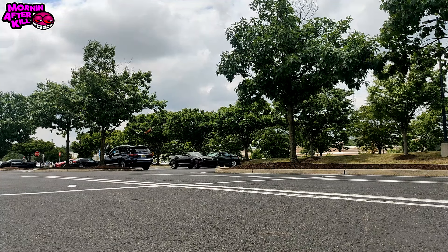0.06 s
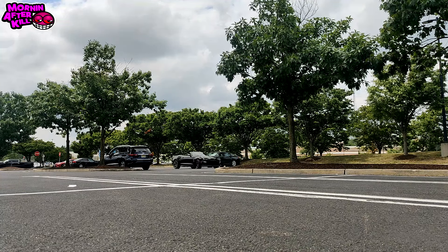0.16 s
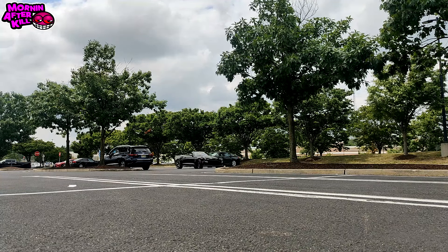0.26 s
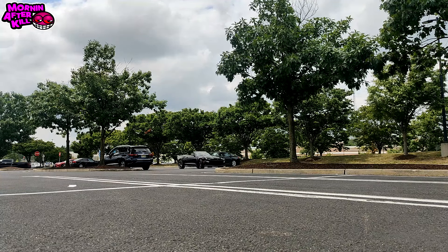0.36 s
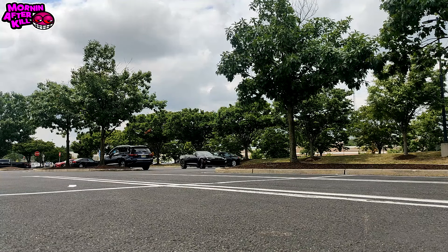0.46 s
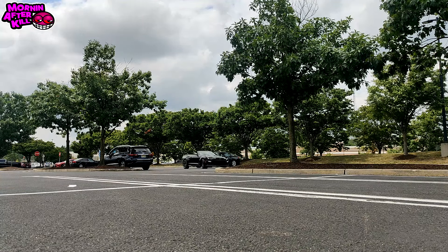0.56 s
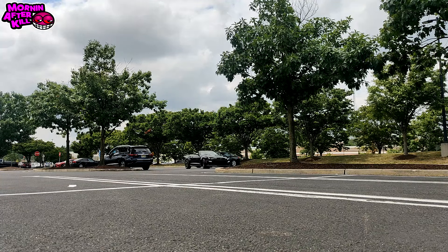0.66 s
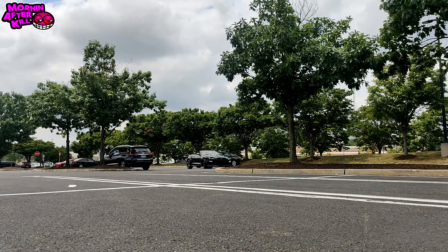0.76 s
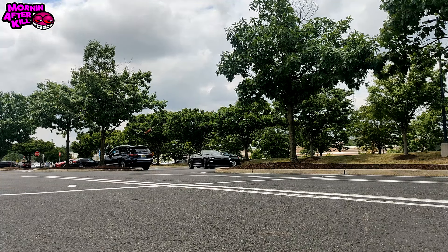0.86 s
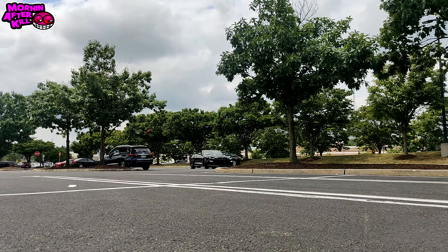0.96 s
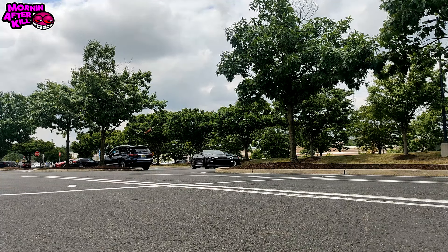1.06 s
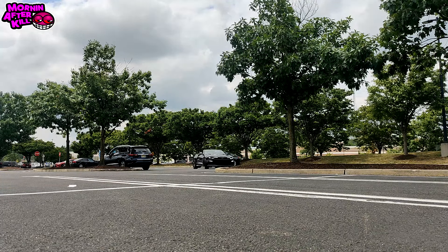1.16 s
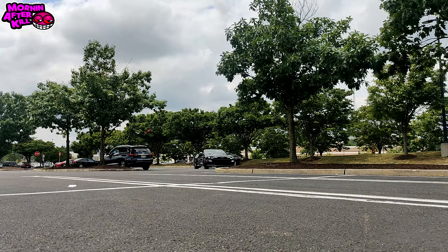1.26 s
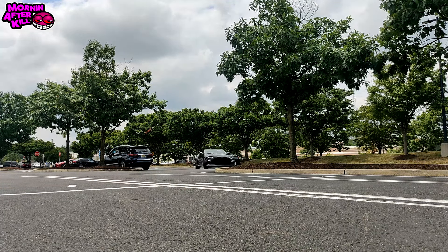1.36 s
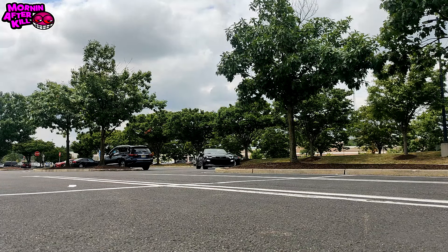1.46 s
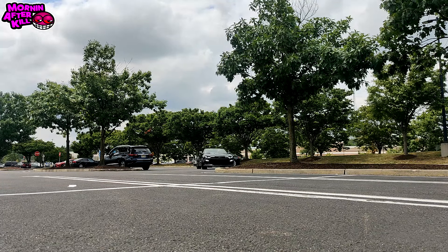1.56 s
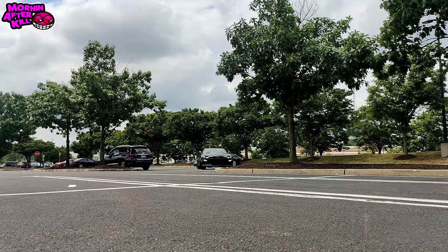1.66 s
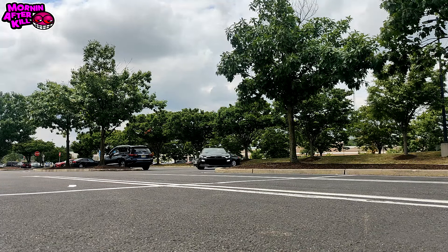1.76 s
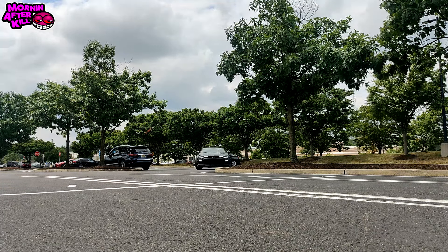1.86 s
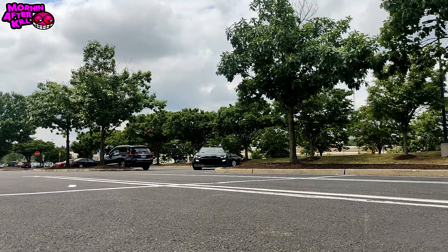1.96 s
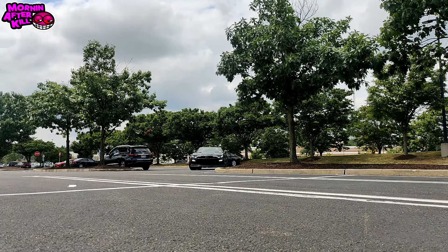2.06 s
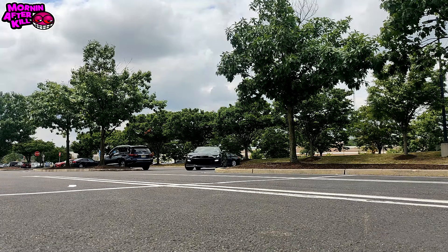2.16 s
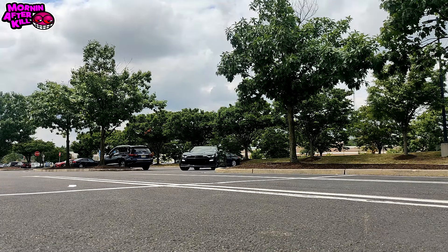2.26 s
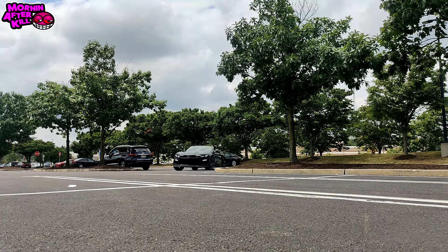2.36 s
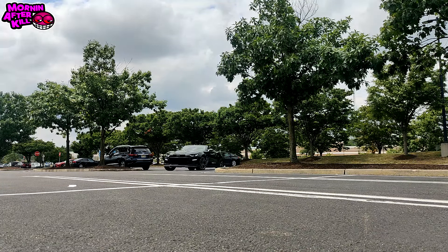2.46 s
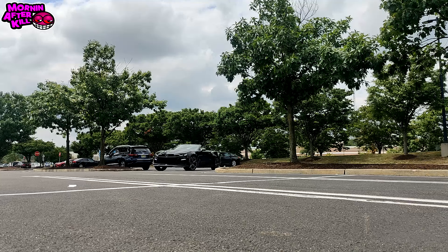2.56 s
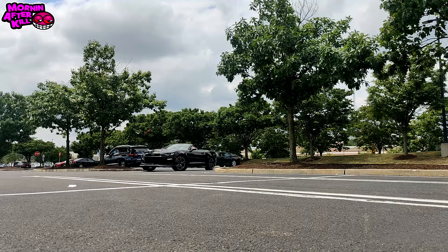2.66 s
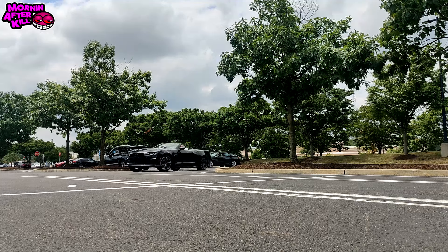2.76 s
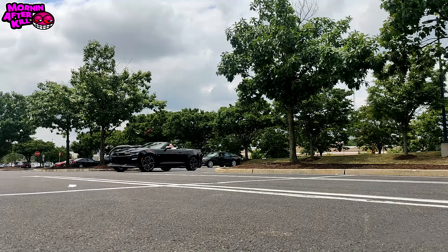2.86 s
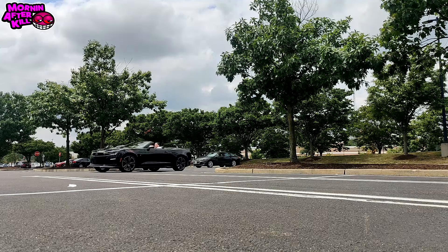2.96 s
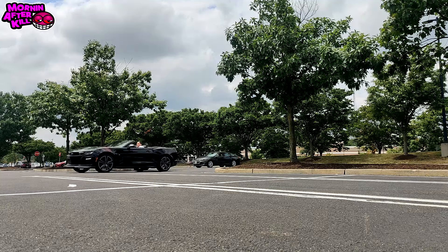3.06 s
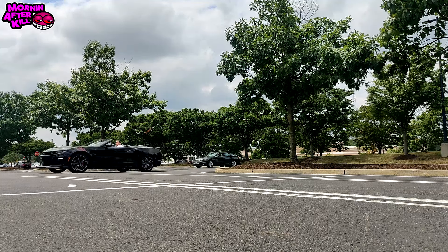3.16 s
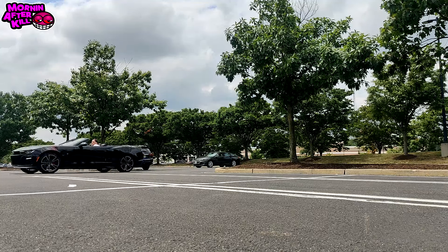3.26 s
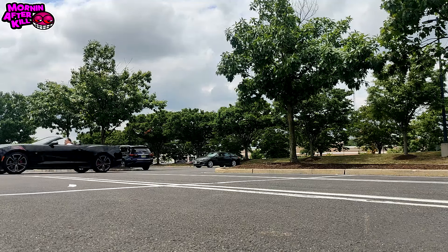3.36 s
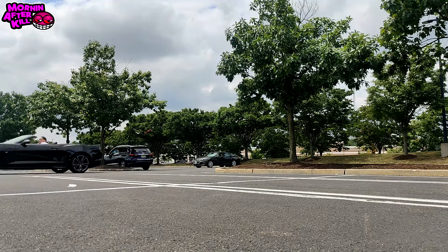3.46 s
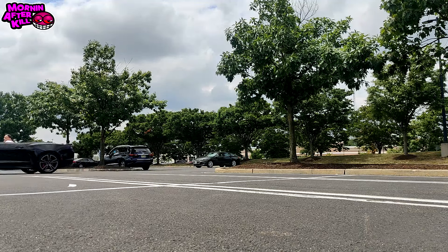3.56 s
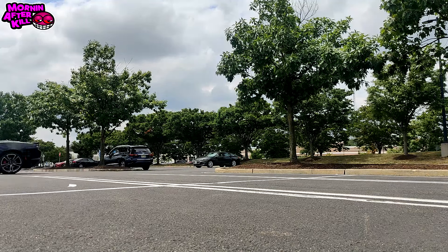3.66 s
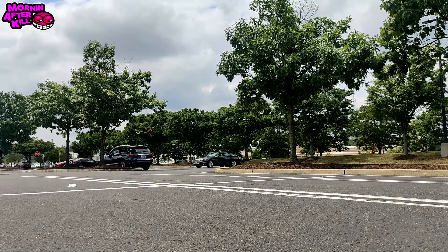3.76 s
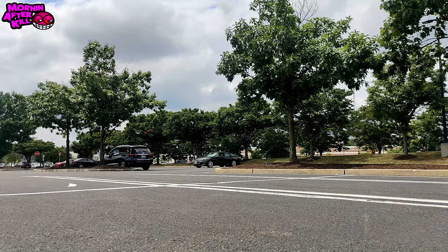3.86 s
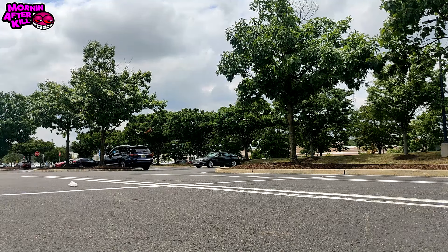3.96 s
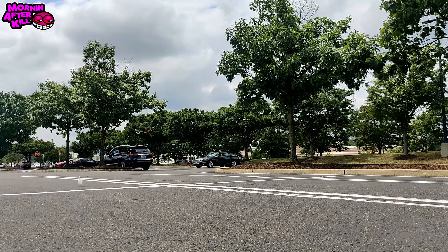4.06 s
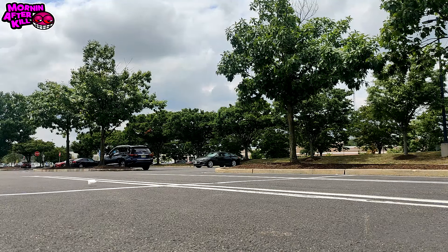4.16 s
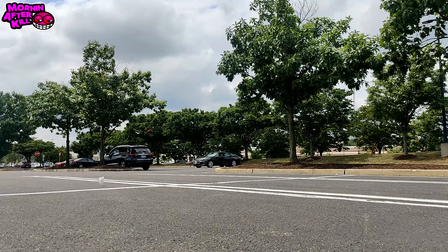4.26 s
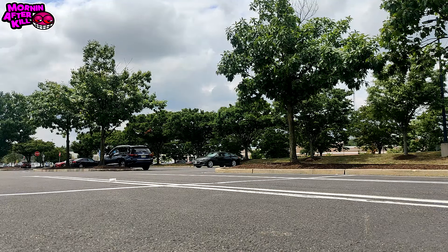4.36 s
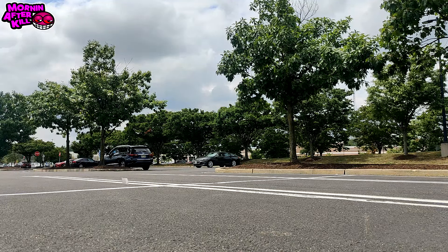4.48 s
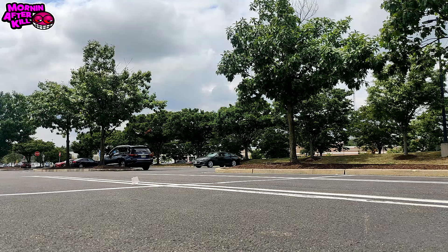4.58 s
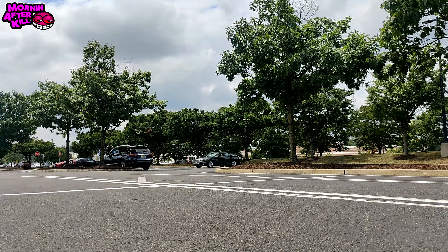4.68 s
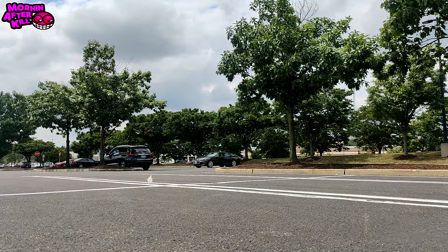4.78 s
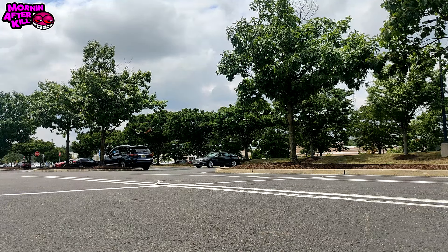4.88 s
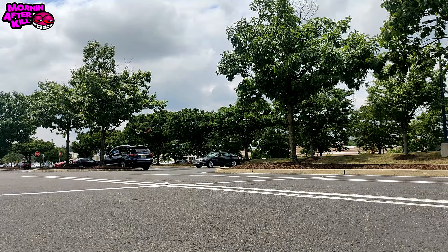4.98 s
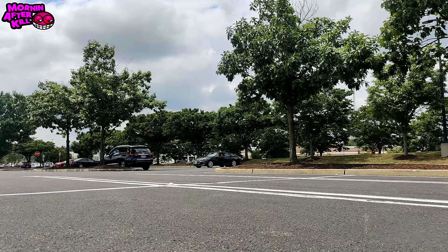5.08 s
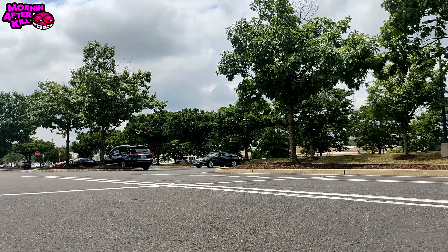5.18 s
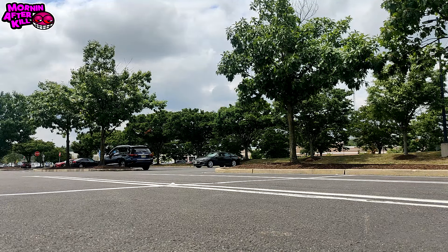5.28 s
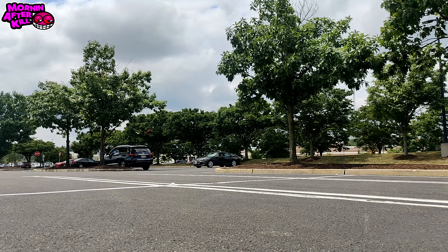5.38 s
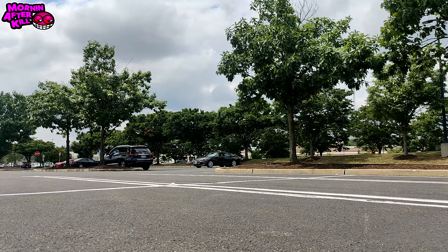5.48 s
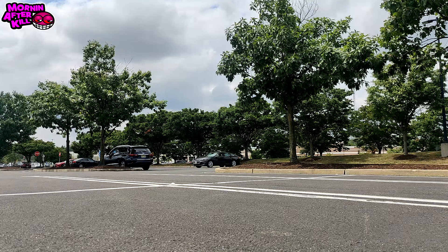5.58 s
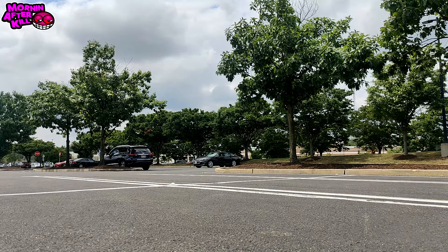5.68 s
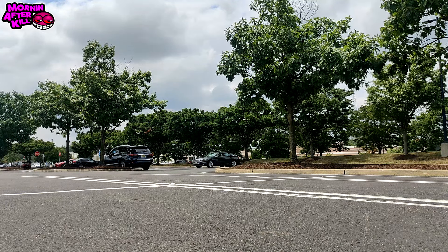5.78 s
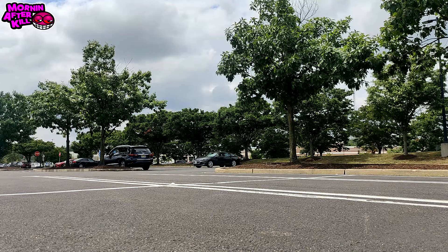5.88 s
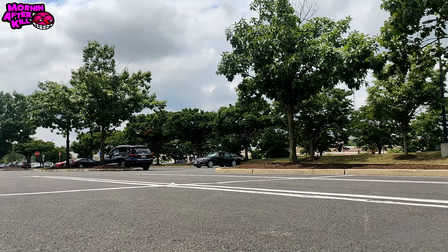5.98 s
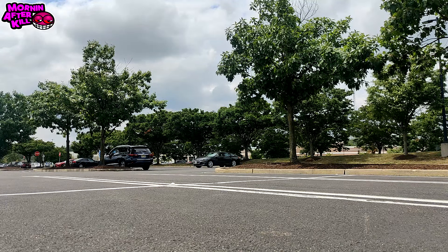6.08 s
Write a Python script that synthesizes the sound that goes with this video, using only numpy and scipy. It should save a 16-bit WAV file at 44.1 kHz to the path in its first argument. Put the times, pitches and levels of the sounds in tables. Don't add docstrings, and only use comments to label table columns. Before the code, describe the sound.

Wind rumbles over a parking lot as a throaty car engine climbs, roars past close by, drops in pitch and fades into tyre hiss.

```python
import sys
import numpy as np
from scipy import signal
from scipy.fft import rfft, irfft, next_fast_len
from scipy.io import wavfile
from scipy.ndimage import uniform_filter1d, map_coordinates

SR = 44100
rng = np.random.default_rng(int(sys.argv[2]) if len(sys.argv) > 2 else 0)


def ratio_of_db(decibels):
    return 10 ** (np.asarray(decibels, float) / 20)


def store_wav(level_fs):
    pcm = np.round(np.clip(np.atleast_2d(level_fs), -1, 1) * 32767)
    wavfile.write(sys.argv[1], SR, pcm.T.astype(np.int16))


N = 270330

# t/s, left lag/samples, left minus right/dB,
# direct share/0-1
BEARING = [(0, 1.5, 2, 0.53), (.5, 2.5, 1, 0.46), (1.1, 8.5, 2, 0.5), (1.9, 10, 0, 0.6),
           (2.1, -5, 1.5, 0.3), (2.5, 1, 1.5, 0.6), (2.9, -3.5, 1.5, 0.8), (3.3, -4.5, 1.4, 0.34),
           (3.7, -8.5, 0, 0.3), (4.1, -16, .5, 0.7), (4.3, -20, 2.5, 0.88), (4.7, -21, 2, 0.74),
           (5.1, -22, 1.5, 0.82), (6.13, -19.5, 2, 0.5)]
# t/s, level/dB
TYRES = [(0, -46), (.63, -48.5), (1.67, -44.5), (2.2, -44), (2.3, -41), (2.62, -41), (2.87, -33.5),
         (3.02, -37), (3.2, -40.5), (3.4, -37), (3.6, -32), (3.77, -33), (3.8, -29), (3.91, -30),
         (3.96, -34.5), (4.2, -40), (4.55, -43), (6.13, -53.5)]
# t/s, level/dB
GAS_FLOW = [(0, -37.5), (1, -34.5), (1.6, -34), (2.24, -29), (2.4, -24.5), (2.72, -23.5), (2.84, -16.5),
            (3.0, -32), (3.3, -21.5), (3.56, -28), (3.78, -29.5), (3.92, -16.5), (4.15, -20), (4.3, -30),
            (4.55, -26), (4.8, -27), (5.2, -25), (6.13, -31.5)]
LIFT_S = 4.15
THROB_AT = .59


def unit(x):
    return x / np.sqrt(np.mean(x ** 2) + 1e-20)


def curves(rows):
    s, *cols = np.transpose(rows)
    return [np.interp(np.arange(N) / SR, s, c) for c in cols]


def wobble(rate):
    coarse = np.arange(0, N + 32, 32)
    knots = rng.standard_normal(int(N * rate / SR) + 4)
    return np.interp(np.arange(N), coarse, map_coordinates(knots, [coarse * rate / SR]))


def gate(s, takes_s):
    return .5 + .5 * np.tanh((np.arange(N) / SR - s) / takes_s)


def bump(s, rise_s, fall_s):
    d = np.arange(N) / SR - s
    return np.exp(-(d / np.where(d < 0, rise_s, fall_s)) ** 2)


def filtered(x, response):
    m = next_fast_len(N + SR // 2)
    return irfft(rfft(x, m) * response(np.fft.rfftfreq(m, 1 / SR)), m)[..., :N]


def colour(points):
    f, db = np.transpose(points)
    return lambda hz: ratio_of_db(np.interp(np.log(hz + 1), np.log(f + 1), db))


def peaks(modes, hz):
    return np.sqrt(sum(ratio_of_db(2 * db) / (1 + ((hz ** 2 - c * c) / ((hz + 1) * w)) ** 2) for c, w, db in modes))


def noise(response, patchy_db):
    z = signal.stft(rng.standard_normal((3, N)), nperseg=512)[2]
    field = uniform_filter1d(rng.standard_normal(z.shape[1:]), size=6, axis=0)
    field = uniform_filter1d(field, size=12, axis=1)
    patchy = signal.istft(z * ratio_of_db(patchy_db * unit(field)), nperseg=512)[1][:, :N]
    return unit(filtered(patchy, response))


def both_ports(response, patchy_db, own):
    common, left, right = noise(response, patchy_db)
    return unit(np.array([common + own * left, 0.88 * (common + own * right)]))


def traffic():
    # f/Hz, level per Hz/dB
    drone = [(50, -120), (75, -0.5), (110, -0.5), (170, -5), (220, -6), (270, -18), (350, -120)]
    swell_db = 6.5 * bump(2.8, 0.92, 0.38)
    duck_db = -11.5 * bump(3.74, 0.058, 0.083)
    return ratio_of_db(-30.5 + swell_db + duck_db) * both_ports(colour(drone), 1.0, own=0.16)


def wind():
    # t/s, level/dB
    wind_levels = [(0.0, -28), (0.01, -28), (1.55, -26), (1.59, -35), (1.72, -22.5), (1.83, -29.5), (2.99, -27),
                   (3.12, -34), (3.28, -25.5), (3.64, -38), (4.76, -23.5), (4.83, -28.5), (4.97, -24),
                   (5.57, -26.5), (5.6, -30), (5.86, -25), (5.89, -28.5), (6.13, -25)]
    # f/Hz, level per Hz/dB
    rumble = [(8, -39), (12, 4.5), (27, -1.5), (59, 1.5), (80, -9.5), (100, -25.5), (140, -120)]
    wind_db = curves(wind_levels)[0] + wobble(14)
    buffet = np.tanh(.6 * both_ports(colour(rumble), .8, own=.38))
    return ratio_of_db(wind_db + 1.5) * unit(buffet)


def grit():
    # t/s, peak level/dB
    ticks = [(2.08, -40.5), (2.239, -37), (3.907, -40.5), (4.2494, -42), (4.4957, -39.5), (4.5294, -43.5),
             (4.6708, -33.5), (4.9174, -43.5), (5.055, -53), (5.1594, -49.5)]
    out, t = np.zeros(N), np.arange(400) / SR
    for s, db in ticks:
        decay = ratio_of_db(db - 5 - 60 * t / .008)
        out[round(s * SR):][:len(t)] += decay * np.diff(rng.standard_normal(len(t) + 1))
    return out * ratio_of_db([[3], [-3]])


def squeaks():
    # start t/s, length/s, f/Hz, level/dB, pitch blur/Hz
    tones = [(0, .4, 7000, -64, 60), (1.2, 1.0, 448, -41, 4), (1.82, .27, 6900, -60, 60),
             (2.225, .065, 2940, -46, 90), (2.3, .055, 2940, -48, 90), (4.298, .018, 880, -25, 20)]
    t, out = np.arange(N) / SR, np.zeros(N)
    for s, length, hz, db, blur_hz in tones:
        shape = np.abs(np.sin(np.pi * np.clip((t - s) / length, 0, 1)) ** .35)
        phase = 2 * np.pi * np.cumsum(hz + blur_hz * wobble(55)) / SR
        out += ratio_of_db(db + 1.9 * wobble(40)) * shape * np.sin(phase)
    return out


def tyre_hiss(near_db, flutter):
    # f/Hz, level per Hz/dB
    treble = [(6000, -120), (7500, 3), (10000, 1), (13000, 1.5), (15700, 3.5), (15800, -43.5),
              (16400, -120)]
    fan_db = 5.5 * bump(2.8, .25, 0.46)
    masked_db = -7 * bump(3.86, 0.14, 0.11)
    wake_db = 5 * bump(4.3, 0.19, 0.37)
    level_db = -61 + 0.78 * near_db + fan_db + masked_db + wake_db
    lean = ratio_of_db([[0], [1.2], [-1.2]])
    return ratio_of_db(level_db + 0.8 * flutter + .7 * wobble(22)) * lean * noise(colour(treble), .8)


def tyre_rush(puff, flutter):
    # f/Hz, level per Hz/dB
    tread = [(1200, -120), (1700, -8.5), (2300, -0.5), (3300, -6), (4800, -9.5), (6000, -14.5),
             (7500, -18.5), (9000, -44), (11000, -120)]
    level_db = curves(TYRES)[0] + 1.8 + .4 * flutter
    return ratio_of_db(level_db) * unit(puff ** .3) * noise(colour(tread), 1.2)


def tyre_roar(near_db, puff):
    # f/Hz, level per Hz/dB
    asphalt = [(400, -120), (560, -10), (700, -6), (850, -5.5), (1050, -9.5), (1300, -10.5), (1700, -14),
               (2100, -16), (2800, -120)]
    gas_db = curves(GAS_FLOW)[0]
    load = gate(2.54, .12) * (1 - .5 * gate(LIFT_S, .08)) * (1 - gate(5.7, 0.31))
    level_db = -38.5 + 0.51 * near_db + 0.068 * (gas_db - gas_db[0]) + 5.5 * load
    return ratio_of_db(level_db) * unit(puff ** .4 * noise(colour(asphalt), 1.2))


def burble(flutter):
    # f/Hz, width/Hz, level/dB
    throat = [(238, 64, 2), (350, 72, -14), (431, 18, -3), (603, 810, -5.5)]

    def response(hz):
        low_cut = hz ** 4 / (hz ** 4 + 200 ** 4)
        return peaks(throat, hz) * low_cut / (1 + (hz / 620) ** 8)

    return ratio_of_db(curves(GAS_FLOW)[0] - 1.2) * unit(ratio_of_db(flutter) * noise(response, 1.5))


def road(turns):
    near_db = curves(TYRES)[0]
    near_db = near_db - near_db[0]
    share = np.clip(curves(BEARING)[2], 0, 1)
    puff = ratio_of_db(np.cos(4 * np.pi * (turns - THROB_AT)) + 2 * np.cos(16 * np.pi * turns))
    flutter = wobble(28)
    layers = [(burble(flutter), .5 + share / 2),
              (tyre_roar(near_db, puff), share),
              (tyre_rush(puff, flutter), .66 * share),
              (tyre_hiss(near_db, flutter), 0.19 * share)]
    direct = sum(np.sqrt(np.clip(s, 0, 1)) * x[0] for x, s in layers)
    scattered = sum(np.sqrt(np.clip(1 - s, 0, 1)) * x[1:] for x, s in layers)
    return direct, scattered


def bank_cracks(turns):
    # t/s, peak level/dB
    fronts_db = [(2.6, -52), (2.85, -24), (3.1, -32), (3.3, -22), (3.55, -5.5), (3.7, -17), (3.9, 0.5),
                 (4.0, -15.5), (4.16, -34)]
    half = np.floor(2 * turns - .12)
    at = np.flatnonzero(np.diff(half)) + 1
    weak_bank_db = 4 * (1 - half[at] % 2)
    peak_db = curves(fronts_db)[0][at] - weak_bank_db + 2.5 * rng.standard_normal(len(at))
    fronts = np.zeros(N)
    fronts[at] = (at < (LIFT_S + .03) * SR) * ratio_of_db(peak_db)
    u = np.arange(400) / SR / .0002
    crack = signal.fftconvolve(fronts, (1 - u) * np.exp(-u))[:N]
    return signal.sosfilt(signal.butter(4, [450, 3200], "band", fs=SR, output="sos"), crack)


def order(turns, k, drift):
    scatter = (.95 if k > 16 else 3) * rng.normal()
    phase = 2 * np.pi * (k * (turns - THROB_AT) + .25)
    return np.sqrt(2) * np.sin(phase + scatter + drift * wobble(10))


def engine():
    # t/s, cycle rate/Hz
    revs = [(1.6, 12.5), (1.9, 14.2), (2.0, 14.3), (2.35, 20.44), (2.53, 22.69), (2.8, 27.32), (2.9, 28.55),
            (3.09, 28.2), (3.17, 28.45), (3.52, 33.43), (3.6, 34.0), (3.71, 33.9), (3.79, 32.24),
            (3.97, 27.12), (4.06, 24.94), (4.17, 23.2), (4.3, 22.4), (5.4, 20.0)]
    # t/s, firing thump/dB, pipe ringing/dB, cylinder unevenness/dB
    effort = [(1.6, -55, -55, -49), (1.95, -38, -29, -43.5), (2.17, -17.5, -17, -40),
              (2.28, -18, -32.5, -49), (2.44, -33.5, -28.5, -41.5), (2.6, -29, -18.5, -39.5),
              (2.8, -25.5, -22, -27), (2.9, -26.5, -23, -29), (3.16, -33, -16.5, -31.5),
              (3.27, -23.5, -15.5, -33), (3.41, -7, -16.5, -23), (3.71, -7, -20, -28),
              (3.88, -14, -19, -26.5), (3.97, -17.5, -11.5, -29), (4.13, -25, -20, -33),
              (4.24, -63, -48, -38.5), (4.45, -55, -36, -44), (5.4, -48, -46, -43)]
    # t/s, level/dB
    intake = [(2.2, -50), (2.38, -27), (2.55, -25), (2.75, -25), (2.9, -34), (3.1, -45), (3.3, -60)]
    # f/Hz, width/Hz, level/dB
    pipe = [(200, 60, -6), (268, 28, 3), (330, 80, -8), (432, 28, 2), (545, 45, -6), (690, 70, -7),
            (815, 77, -7), (989, 100, -7), (1300, 300, -14)]
    # f/Hz, width/Hz, level/dB
    tailpipe = [(279.5, 67, -0.5), (351, 40, -5), (384, 21, -8), (447.2, 27.5, 1.5), (546, 21, 0.5)]
    # multiple of the cycle, level/dB
    drivers = [(10, -1.5), (14, -1.5), (16, -1)]
    # multiple, start t/s, level/dB, fade/dB per s
    coasting = [(12, 4.1, -23, 15), (19, 4.2, -28, 30)]
    # multiple of the cycle, level/dB
    unequal = [(4, -8), (6, -1), (7, -2), (9, -3), (11, 2), (12, 2), (13, 0), (15, -5), (17, -8)]
    (hz,), (firing_db, ring_db, uneven_db) = curves(revs), curves(effort)
    t = np.arange(N) / SR
    turns = np.cumsum(hz) / SR
    grid = np.arange(2000.)
    ring, sharp = peaks(pipe, grid), peaks(tailpipe, grid) ** 2

    strong = ratio_of_db(firing_db + .3) * order(turns, 8, .1)
    strong += ratio_of_db(curves(intake)[0]) * order(turns, 5, .1)
    for k, db in drivers:
        k = round(k)
        level = ratio_of_db(ring_db + db + 1.5 * wobble(12))
        strong += level * np.interp(k * hz, grid, sharp) * order(turns, k, .2)
    for k, s, db, fade_db in coasting:
        level = ratio_of_db(db - fade_db * abs(t - s) + 2 * wobble(9))
        strong += gate(s, .03) * level * order(turns, k, .3)

    shade_db = -0.3728 + (-0.1667 + 0.3728) * gate(3.5, 0.076)
    upper = [(k, 8 - .38 * (k - 18) - 6.5 * (k % 2)) for k in range(18, 45)]
    weak = np.zeros(N)
    for k, db in [*unequal, *upper]:
        shaded_db = shade_db * min(max(k - 10, 0), 16)
        level = ratio_of_db(db + shaded_db + 3.5 * wobble(5 + k / 3))
        weak += level * np.interp(k * hz, grid, ring) * order(turns, k, .15 + k / 150)

    heard = gate(1.75, .08) * (1 - gate(5.25, .08))
    return heard * (strong + ratio_of_db(uneven_db - .3) * weak + 2.0 * bank_cracks(turns)), turns


def place(direct, scattered):
    lag, pan_db = curves(BEARING)[:2]
    ports = []
    for side in (1, -1):
        arrival = np.arange(N) - side * lag / 2
        ports.append(map_coordinates(direct, [arrival], order=5, mode="nearest"))
    return (np.array(ports) + scattered) * ratio_of_db([pan_db / 2, -pan_db / 2])


def scene():
    exhaust, turns = engine()
    direct, scattered = road(turns)
    car = place(exhaust + direct + squeaks(), scattered)
    return car + wind() + traffic() + grit()


def band_limit(x):
    return signal.sosfilt(signal.butter(12, 16320, fs=SR, output="sos"), x)


def record(dry):
    rounded = dry / (1 + np.abs(dry) ** 6) ** (1 / 6)
    band = filtered(rounded, lambda hz: hz < 15750)
    return band_limit(band)


dry = scene()
out = record(dry)
store_wav(out)
```